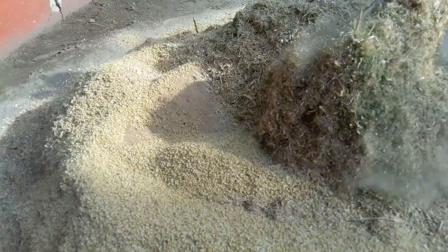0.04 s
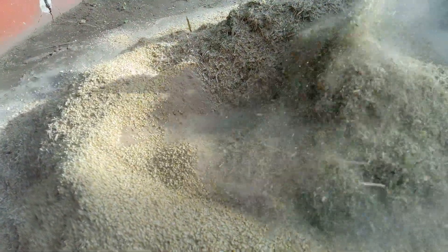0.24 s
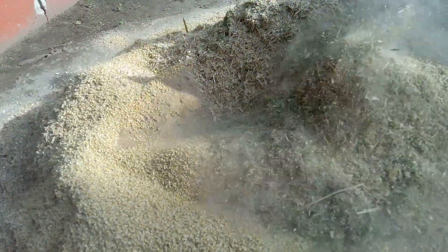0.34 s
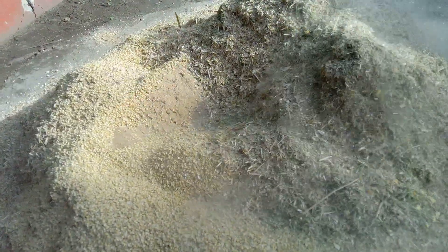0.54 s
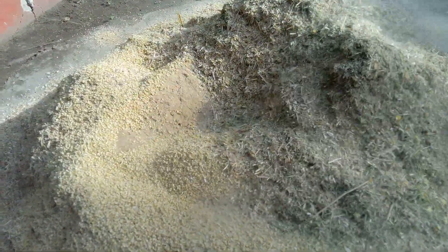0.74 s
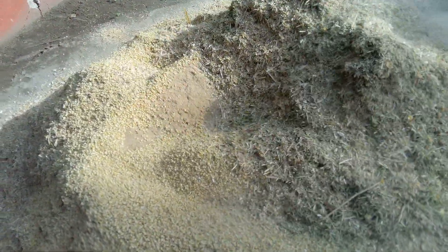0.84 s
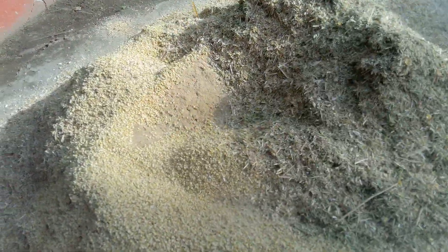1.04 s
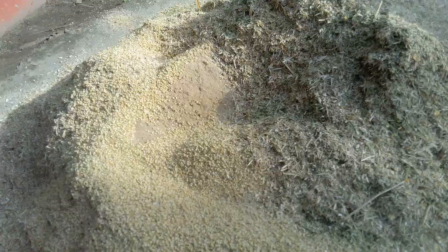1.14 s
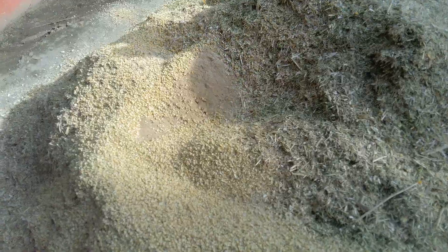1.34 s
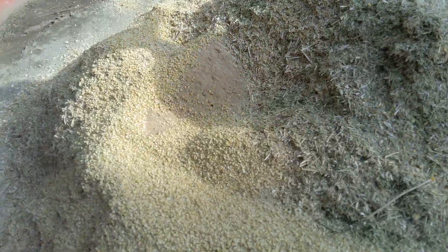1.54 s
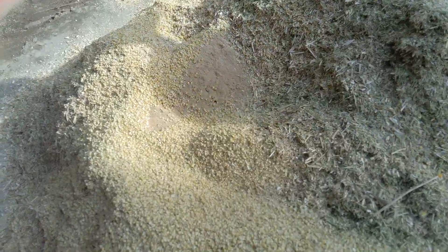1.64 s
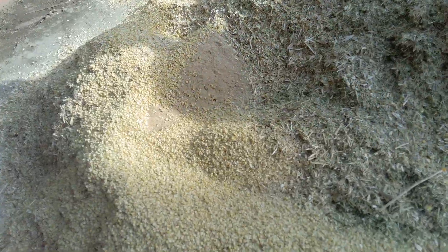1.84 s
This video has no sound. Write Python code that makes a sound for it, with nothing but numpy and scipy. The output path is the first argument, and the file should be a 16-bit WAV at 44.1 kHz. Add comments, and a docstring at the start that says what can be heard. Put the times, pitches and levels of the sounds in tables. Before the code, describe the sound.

One short steel shovel scrape on gritty ground outdoors, after a soft swish of falling meal.

```python
"""A concrete yard, where feed is mixed with a steel shovel. A thrown load of dry meal swishes down on
the heap as a multitude of tiny impacts. Then the blade touches the ground, bites and scrapes briefly
into the heap; grit passing under the edge excites its damped modes, so that it rings dully.
Behind it lie a low outdoor rush, a distant hum and light wind on the microphone."""
import sys
import numpy as np
from scipy import signal
from scipy.fft import rfft, irfft, next_fast_len
from scipy.io import wavfile
from scipy.ndimage import map_coordinates

SR = 44100
rng = np.random.default_rng(int(sys.argv[2]) if len(sys.argv) > 2 else 0)


def store_wav(level_fs):
    """Save 16-bit WAV to argv[1]."""
    pcm = np.round(np.clip(np.atleast_2d(level_fs), -1, 1) * 32767)
    wavfile.write(sys.argv[1], SR, pcm.T.astype(np.int16))


N = 83790
TIME_S = np.arange(N) / SR

# contacts of blade and ground: start_s, level_db, decay_s (to fall by 20 dB)
CONTACTS = [(0.9333, -50, 0.014), (.983, -28, 0.036), (1.0305, -58, 0.018), (1.1329, -53.5, .01)]
# spectrum of meal sliding on steel: frequency_hz, gain_db
HISS_SPECTRUM = [(1000, -39), (4000, 0.5), (5500, 4.5), (7000, -1), (8400, 1.5), (10000, 0), (12700, 3),
                 (15000, -10)]


def amp(db):
    """Amplitude ratio of a level in decibels."""
    return 10 ** (np.asarray(db) / 20)


def unit(x):
    """Normalisation to rms 1."""
    return x / np.sqrt(np.mean(x ** 2) + 1e-20)


def curves(rows):
    """Linear interpolation in time of each column after the first."""
    times_s, *columns = np.transpose(rows)
    return [np.interp(TIME_S, times_s, column) for column in columns]


def wobble(rate_hz):
    """Smooth random modulation: a spline through rate_hz random values a second."""
    knots = rng.standard_normal(int(N * rate_hz / SR) + 4)
    return map_coordinates(knots, [TIME_S * rate_hz])


def swells(rows):
    """A sum of Gaussian envelopes, each with standard deviation width_s."""
    return sum(amp(db) * np.exp(-.5 * ((TIME_S - peak_s) / width_s) ** 2) for peak_s, width_s, db in rows)


def filtered(x, response):
    """Linear filtering by a frequency response, scaled to conserve the power of white noise."""
    size = next_fast_len(N + SR // 2)
    gain = response(np.fft.rfftfreq(size, 1 / SR))
    return irfft(rfft(x, size) * gain / np.sqrt(np.mean(np.abs(gain) ** 2)), size)[:N]


def colour(x, spectrum):
    """Spectral shaping by relative gains, interpolated in log frequency."""
    frequency_hz, gain_db = np.transpose(spectrum)
    return filtered(x, lambda hz: amp(np.interp(np.log(hz + 1), np.log(frequency_hz), gain_db)))


def noise(spectrum):
    """Coloured Gaussian noise of rms 1."""
    return unit(colour(rng.standard_normal(N), spectrum))


def grains(per_s, spread_db):
    """Shot noise of rms 1: tiny independent impacts of scattered size."""
    size = amp(spread_db * np.clip(rng.standard_normal(N), -2, 2))
    polarity = np.sign(rng.standard_normal(N))
    return unit(size * polarity * (rng.random(N) < per_s / SR))


def narrowband(centre_hz, width_hz):
    """Quadrature modulation shifts low-pass noise to a band about centre_hz; rms 1."""
    lowpass = signal.butter(2, width_hz / 2, fs=SR, output="sos")
    in_phase, quadrature = signal.sosfilt(lowpass, rng.standard_normal((2, N)))
    phase = 2 * np.pi * np.cumsum(np.broadcast_to(centre_hz, N)) / SR
    return unit(in_phase * np.cos(phase) + quadrature * np.sin(phase))


def outdoor_rush(level_db=-56):
    """Ambient noise: broadband and nearly steady, its power falling with frequency."""
    # spectrum of the yard: frequency_hz, gain_db
    spectrum = [(20, 5), (70, 3), (150, -1.5), (250, -6.5), (450, -12), (700, -12), (1400, -17.5),
                (2200, -23), (4000, -27.5), (7000, -33), (13000, -44), (16000, -53)]
    return amp(level_db + 0.2 * wobble(7.1)) * noise(spectrum)


def distant_hum(pitch_hz=64.4, level_db=-58.5, waver_rad=0.27, flutter_db=4.4):
    """A low tone wavers under random phase and amplitude modulation."""
    phase = 2 * np.pi * pitch_hz * TIME_S + waver_rad * wobble(6.9)
    return amp(level_db) * unit(np.sin(phase) * amp(flutter_db * wobble(9.17)))


def wind():
    """Turbulence at the microphone gives low-frequency pressure fluctuations."""
    # course of the gusts: time_s, level_db
    gusts = [(0, -57.5), (.13, -63), (.29, -51.5), (.38, -50), (.47, -48.5), (.6, -61), (.8, -54.5),
             (1.12, -54.5), (1.18, -48), (1.34, -50), (1.52, -65), (1.66, -57.5), (1.9, -57)]
    # spectrum of the buffeting: frequency_hz, gain_db
    spectrum = [(8, -9), (17, 5.5), (38, -1.5), (60, -5), (120, -21), (400, -49)]
    level_db, = curves(gusts)
    return amp(level_db) * noise(spectrum)


def falling_meal():
    """Superposed impacts: dense ones merge into a swish, sparser ones patter, and clumps thud."""
    # flow of the thrown load: time_s, level_db
    fall = [(0, -69.5), (.1, -66.5), (.2, -62), (.31, -57.5), (.41, -63), (.53, -65.5), (.68, -77.5),
            (.9, -87)]
    # later flow down the heap: time_s, level_db
    trickle = [(1.2, -89), (1.37, -75.5), (1.5, -73.5), (1.65, -71.5), (1.76, -68), (1.9, -70)]
    # spectrum of both flows: frequency_hz, gain_db
    swish_spectrum = [(300, -8), (1500, -12), (2300, -11), (2900, 0), (4700, -0.5), (6000, -6), (8000, -2),
                      (11500, 1.5), (13500, 1), (15500, -7)]
    # the load lands, the heap settles: peak_s, width_s, level_db
    patters = [(.4, 0.19, -60), (1.33, 0.11, -63.5)]
    # spectrum of that soft patter: frequency_hz, gain_db
    patter_spectrum = [(50, -16), (130, -2.5), (300, -1), (500, -7), (850, -10), (2000, -18.5),
                       (5000, -33.5)]
    # clumps of feed dropping: peak_s, width_s, level_db
    clumps = [(.548, 0.021, -53), (0.824, 0.013, -57.5), (1.119, 0.01, -46.5)]
    # spectrum of their thud: frequency_hz, gain_db
    clump_spectrum = [(60, -15), (120, -1), (170, -1.5), (270, -4.5), (400, -16.5), (1500, -36.5)]
    (fall_db,), (trickle_db,) = curves(fall), curves(trickle)
    flow = amp(np.where(TIME_S < trickle[0][0], fall_db, trickle_db))
    swish = flow * colour(grains(per_s=16000, spread_db=5), swish_spectrum)
    patter = swells(patters) * colour(grains(per_s=1100, spread_db=3), patter_spectrum)
    return swish + patter + swells(clumps) * noise(clump_spectrum)


def blade(force):
    """Modal superposition: the steel blade responds as a sum of resonators damped by the feed on it."""
    # modes of the blade: pitch_hz, bandwidth_hz, gain_db
    modes = [(206.5, 20, 7.5), (317.3, 17.6, 7), (404, 17, 8.5), (459, 33, 2), (649, 20, 2),
             (1130, 48, 0.5), (1603, 15, 4.5), (1899, 30, 11), (2660, 170, -9), (3480, 60, 2),
             (3760, 100, -4.5), (4350, 66, 0.5), (4590, 55, -10), (8260, 120, -7)]

    def response(hz):
        return sum((-1) ** k * amp(db) * 1j * hz * width / (pitch ** 2 - hz ** 2 + 1j * hz * width)
                   for k, (pitch, width, db) in enumerate(modes))
    return filtered(force, response)


def scrape(ring_db=-2.5, smother_db_per_s=31, grit_db=-2, judder_db=1.7):
    """Sliding friction: grit rings the blade, less as it sinks in, while meal hisses over the steel."""
    # grinding on concrete and sliding of meal: time_s, grind_db, hiss_db
    stroke = [(.93, -75, -81), (.945, -53.5, -64), (.96, -49, -62), (.973, -43.5, -52), (.987, -38.5, -48),
              (1.002, -45.5, -48), (1.018, -43.5, -50), (1.036, -42, -51), (1.065, -43, -48.5),
              (1.08, -45.5, -48), (1.098, -46, -53.5), (1.132, -45, -58.5), (1.16, -50.5, -63),
              (1.19, -57, -67), (1.26, -80, -88)]
    # spectrum of grit under the edge: frequency_hz, gain_db
    grit_spectrum = [(60, -43), (150, -5), (500, -2), (1000, -9), (1300, -5), (1600, -0.5), (2100, -8),
                     (2300, -14.5), (2850, -7.5), (3100, -12.5), (4200, -6.5), (5200, -17), (7000, -24),
                     (15000, -33)]
    grind_db, hiss_db = curves(stroke)
    bite_s = CONTACTS[1][0]
    sunk_s = np.maximum(TIME_S - bite_s, 0)
    judder = amp(judder_db * wobble(160))
    force = amp(grind_db) * judder * grains(per_s=4500, spread_db=3)
    ring = blade(force * amp(ring_db - smother_db_per_s * sunk_s))
    grit = amp(grit_db) * colour(force, grit_spectrum)
    hiss = amp(hiss_db) * judder * colour(grains(per_s=20000, spread_db=2), HISS_SPECTRUM)
    return ring + grit + hiss


def scoop(width_hz=230, body_db=-3):
    """A hollow, noise-excited resonance rises and sinks as the blade slides under the heap."""
    # note of the filling shovel: time_s, level_db, centre_hz
    note = [(.93, -70, 330), (.97, -45.5, 345), (.99, -43.5, 397.3), (1.012, -45, 566.8), (1.034, -39, 662),
            (1.058, -37.5, 701), (1.076, -40.5, 749), (1.095, -39, 708.5), (1.122, -45, 503.5),
            (1.135, -39, 471.7), (1.165, -51.5, 478.3), (1.21, -67, 450)]
    # spectrum of the broad noise around it: frequency_hz, gain_db
    body_spectrum = [(60, -17), (140, -3.5), (300, -6.5), (550, 0.5), (950, 2), (1300, -14), (2500, -10.5),
                     (8000, -34)]
    level_db, centre_hz = curves(note)
    return amp(level_db) * unit(narrowband(centre_hz, width_hz) + amp(body_db) * noise(body_spectrum))


def knocks(blow_db=20, crunch_db=-3, crack_db=-16.5):
    """Impact excitation: a blow and a crunch of grit ring the blade, edged by a bright crack."""
    envelope, blows = np.zeros((2, N))
    for start_s, level_db, decay_s in CONTACTS:
        envelope += (TIME_S >= start_s) * amp(level_db - 20 * np.abs(TIME_S - start_s) / decay_s)
        blows[round(start_s * SR)] = amp(level_db + blow_db)
    crunch = envelope * grains(per_s=18000, spread_db=1.5)
    crack = amp(crack_db) * colour(crunch, HISS_SPECTRUM)
    return blade(blows + amp(crunch_db) * crunch) + crack


def skids():
    """Friction of a dragged stone gives a burst of narrowband noise, heard as a rough squeak."""
    # stones under the edge: peak_s, width_s, pitch_hz, bandwidth_hz, level_db
    stones = [(0.938, 0.0022, 3550, 800, -55), (0.972, 0.0055, 4400, 500, -47),
              (1.049, 0.017, 2605, 160, -49.5), (1.079, 0.0075, 3880, 161, -49),
              (1.133, 0.0076, 2130, 300, -45)]
    return sum(swells([(peak_s, width_s, level_db)]) * narrowband(pitch_hz, bandwidth_hz)
               for peak_s, width_s, pitch_hz, bandwidth_hz, level_db in stones)


def scene():
    """Superposition: the pressures of all sources add at one microphone."""
    background = outdoor_rush() + distant_hum() + wind()
    return (background + falling_meal() + scrape() + scoop() + knocks() + skids())[None]


def record(dry, cutoff_hz=15300):
    """Band limiting: an ideal low-pass filter passes nothing above the cutoff."""
    size = next_fast_len(N + SR // 2)
    passband = np.fft.rfftfreq(size, 1 / SR) < cutoff_hz
    return irfft(rfft(dry, size) * passband, size)[:, :N]


dry = scene()
out = record(dry)
store_wav(out)
```